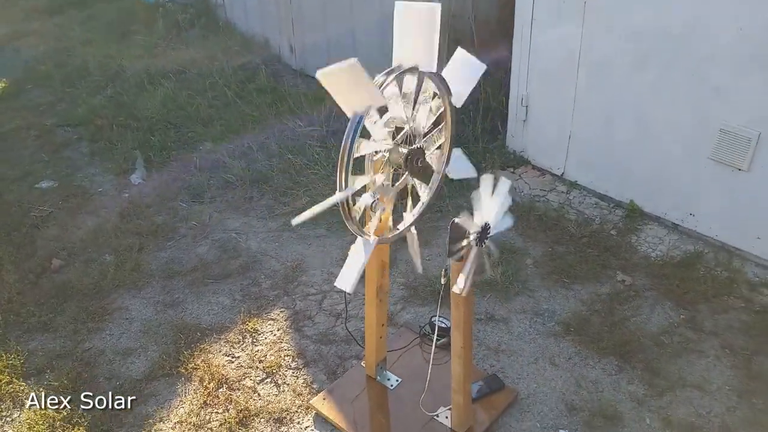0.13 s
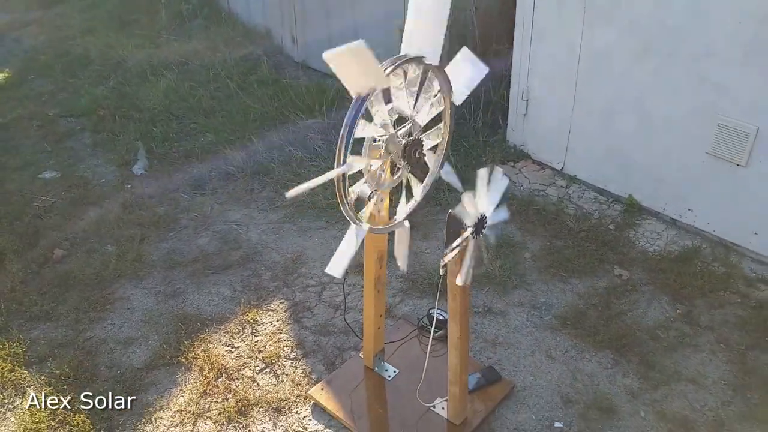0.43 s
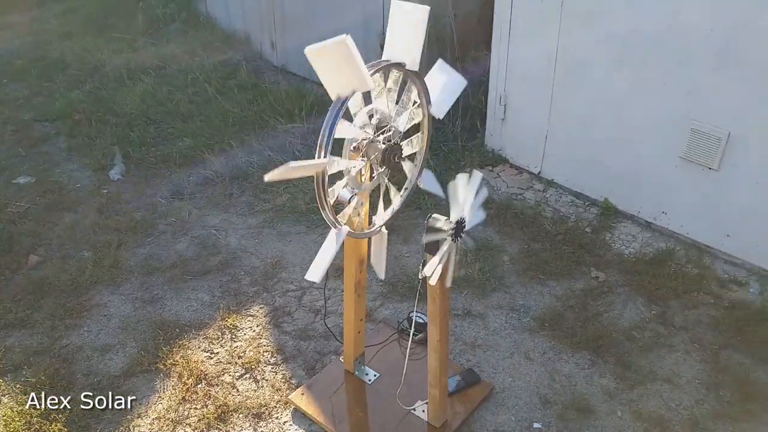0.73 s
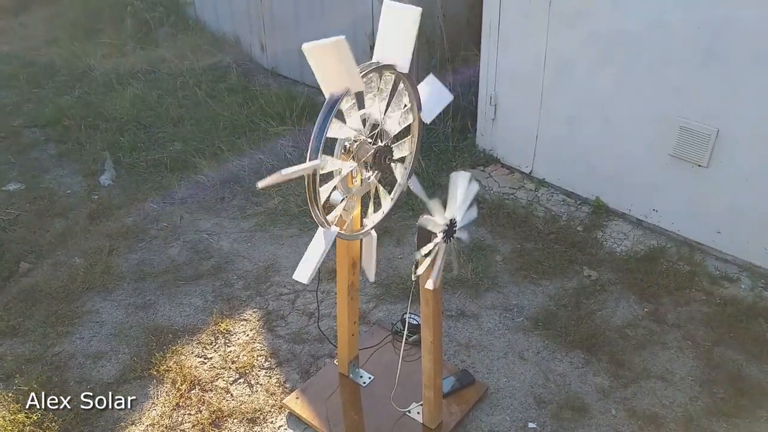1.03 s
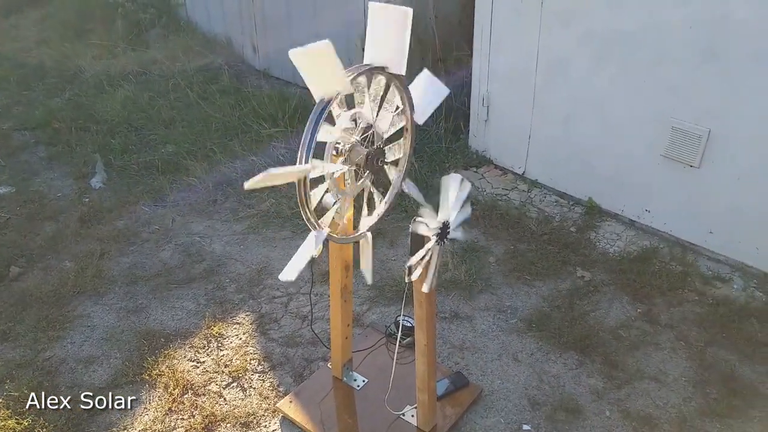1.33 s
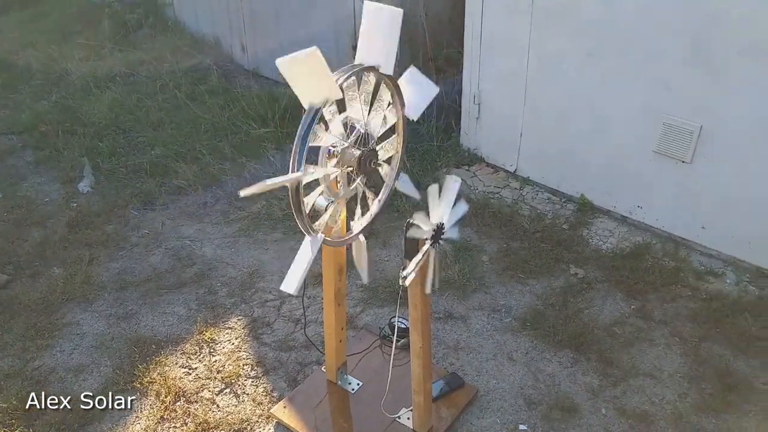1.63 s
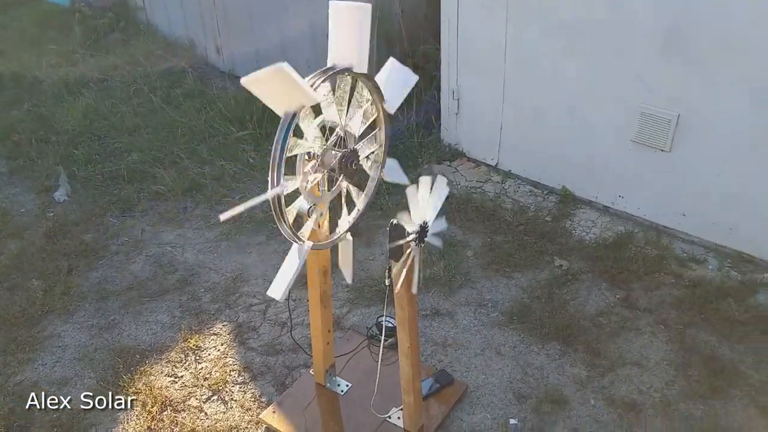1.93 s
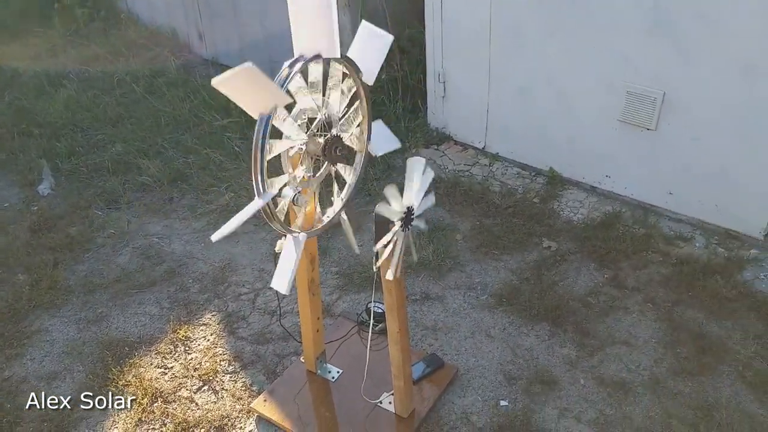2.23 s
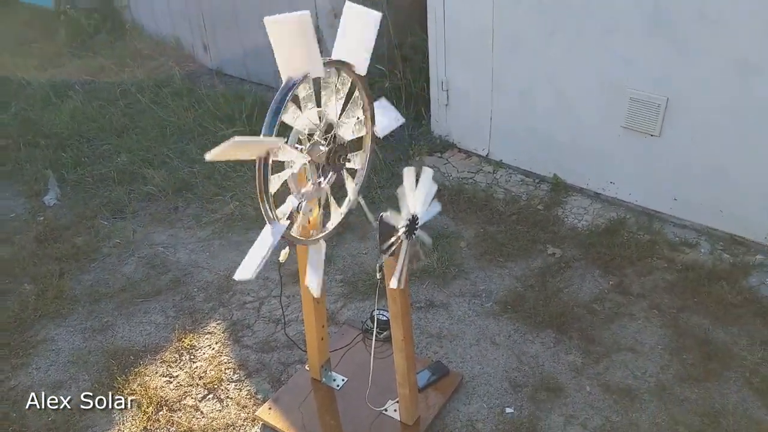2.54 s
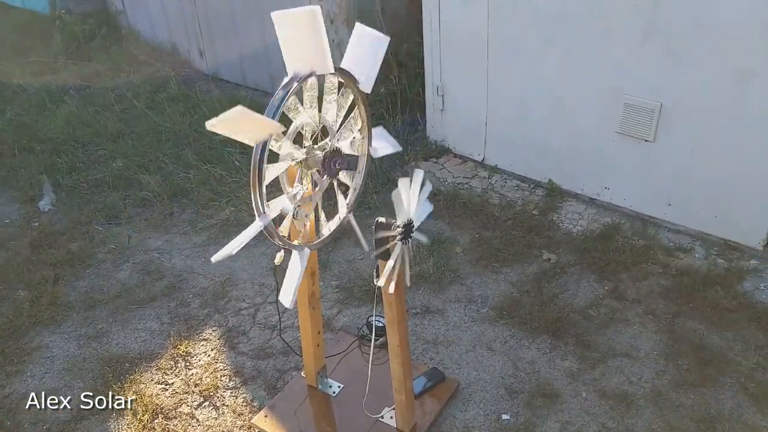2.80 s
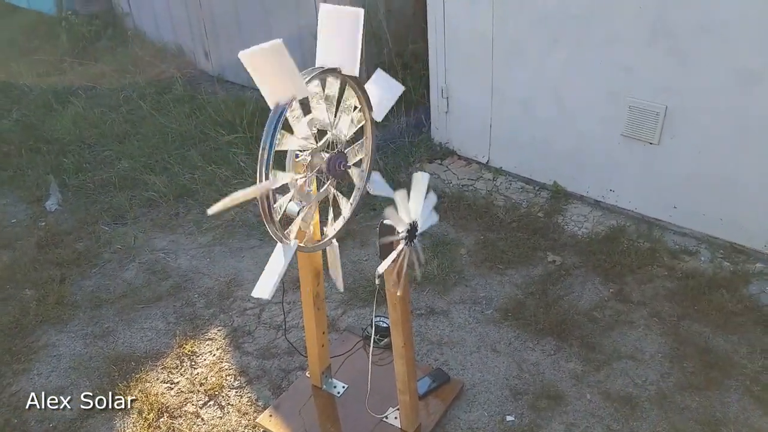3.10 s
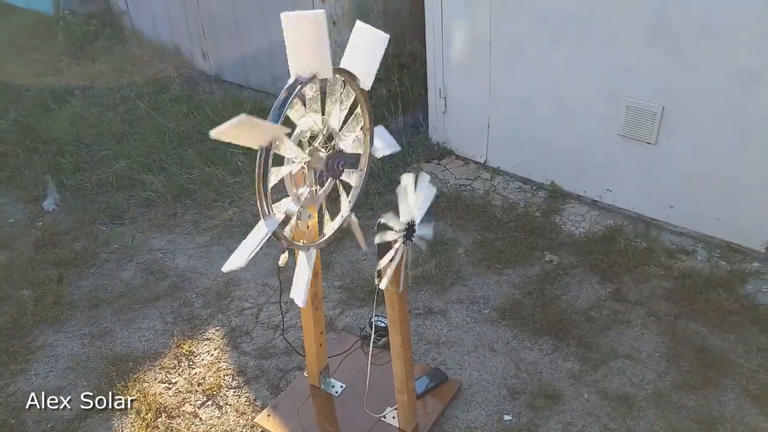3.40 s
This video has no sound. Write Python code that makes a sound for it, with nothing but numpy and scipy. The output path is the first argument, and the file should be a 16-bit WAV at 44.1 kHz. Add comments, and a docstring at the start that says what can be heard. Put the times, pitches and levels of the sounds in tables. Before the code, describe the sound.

Small wind turbine rotor whirs with rapid fluttering swishes while wind rumbles and buffets the microphone

```python
"""A small many-bladed wind rotor whirs in a yard, about fifteen turns a second: shaped noise for the steady
rush of blades, and a strong and a weak noise burst per turn for the swishes, with a narrow whistling hiss.
Wind rumbles throughout as slow-shaped noise; from early on, eddies buffet the microphone as short swings
and puffs. Midway its angle changes: the swishes darken and tighten into falling chops. After a lull the
buffets return at their hardest. The generator hums faintly on its post throughout, as narrow noise bands."""
import sys
import numpy as np
from scipy import signal
from scipy.fft import rfft, irfft
from scipy.io import wavfile
from scipy.ndimage import uniform_filter1d

SR = 44100
rng = np.random.default_rng(int(sys.argv[2]) if len(sys.argv) > 2 else 0)


def put_to_file(sound):
    """Save the sound as 16-bit audio at rate SR, in the file named by the first command-line argument."""
    columns = np.atleast_2d(sound).T  # one column per channel
    safe = np.clip(columns, -1, 1)
    whole_steps = np.round(safe * 32767)
    wavfile.write(sys.argv[1], SR, whole_steps.astype(np.int16))


N = 156996
FRAME = 256  # samples


def amp(db):
    """Decibels to gain."""
    return 10 ** (np.asarray(db) / 20)


def evened(x):
    """Scales to rms 1."""
    return x / np.sqrt(np.mean(x ** 2) + 1e-20)


def curve(table, t, axis=1):
    """One column of a table, joined by straight lines in time."""
    rows = np.array(table, float)
    return np.interp(t, rows[:, 0], rows[:, axis])


def colour(table, hz, axis=1):
    """One column of a table, joined by straight lines on log frequency."""
    rows = np.array(table, float)
    return np.interp(np.log(hz + 1), np.log(rows[:, 0]), rows[:, axis])


def wobble(rate_hz):
    """Smooth random signal of rms 1, rolled off above a rate."""
    hz = np.fft.rfftfreq(N, 1 / SR)
    slowed = rfft(rng.standard_normal(N)) / (1 + (hz / rate_hz) ** 4)
    return evened(irfft(slowed, N))


def grid(size):
    """Frame times in s (a column) and bin frequencies in Hz (a row)."""
    hop = size // 4
    frame_s = np.arange(N // hop + 3)[:, None] * hop / SR
    return frame_s, np.fft.rfftfreq(size, 1 / SR)


def air(field_db, patch_db):
    """Turbulence noise: follows a time-frequency field in dB per Hz, with random patches."""
    size = 2 * (field_db.shape[1] - 1)
    frames = dict(nperseg=size, noverlap=size - size // 4)
    white = rng.standard_normal(N + 2 * size)
    bins = signal.stft(white, **frames)[2].T[:len(field_db)]
    patches = uniform_filter1d(rng.standard_normal(bins.shape), size=8, axis=0)
    patches = evened(uniform_filter1d(patches, size=4, axis=1))
    shaped = bins * amp(field_db + patch_db * patches)
    return signal.istft(shaped.T, **frames)[1][:N] * np.sqrt(SR / 2)


def angled(table, hz, share):
    """Blends the spectra of the two microphone angles by power, in dB."""
    share = np.clip(share, 0, 1)
    first_power = amp(colour(table, hz)) ** 2
    second_power = amp(colour(table, hz, axis=2)) ** 2
    return 10 * np.log10((1 - share) * first_power + share * second_power)


# rotor speed: start_s, turns_per_s
TURN_RATE = [(0, 15.14), (.8, 15.14), (1.1, 15.2), (2, 15.17), (2.5, 15.2), (2.8, 15.29), (3.05, 15.17),
             (3.5, 15.08)]
# progress from first to second angle (0-1): start_s, rush_share, strong_share, weak_share
ANGLE = [(0, 0.1, 0.024, .02), (1.1, 0, .03, 0.054), (1.7, 0.6, 0.046, 0.079), (1.95, 0.58, 0.23, 0.56),
         (2.3, 0.62, 0.24, 0.75), (2.67, 0.46, 1, 0.84), (3.0, 0.95, 0.97, 0.94), (3.56, 0.76, 0.66, .97)]
# rotor loudness offsets: start_s, rush_db, swish_db
EFFORT = [(0, 0.16, 1.1), (1.15, -0.1, 0.6), (1.6, -1, 2), (2.0, -0.9, 0.5), (2.35, -1, 0),
          (2.65, 1.1, 1.3), (2.85, 0.5, 2), (2.935, 1, 3.5), (3.0, 0, 1.2), (3.15, -0.5, 1.6),
          (3.38, 0, -1.5), (3.56, -0.5, 1.5)]
# delay within a swish at the second angle, scaled by each swish's sweep: pitch_hz, delay_s
SWEEP = [(1600, 0.0055), (3000, .001), (5000, -.0025), (7200, -0.0039), (9500, 0.0011)]
START_TURN = -0.03  # turns
SWISH_SPREAD_OCT, SWISH_PATCH_DB = 0.034, 0.75
FLUTTER_DB, FLUTTER_HZ = 1.3, 650
TIGHTEN = 0.15  # share of width lost at the second angle


def swish(spectrum, axis, place_turn, rise_s, fade_s, level_db, sweep):
    """Once a turn hiss swells and fades; at the second angle it is shorter and its bands are staggered."""
    t, hz = grid(size=FRAME)
    now = np.arange(N) / SR
    rotor_turns = START_TURN + np.cumsum(curve(TURN_RATE, now)) / SR
    turns = np.interp(t, now, rotor_turns) - place_turn
    nearest = np.round(turns).astype(int)
    share = np.clip(curve(ANGLE, t, axis=axis), 0, 1)
    offset_s = (turns - nearest) / curve(TURN_RATE, t) - sweep * share * colour(SWEEP, hz)
    width_s = np.where(offset_s < 0, rise_s, fade_s) * (1 - TIGHTEN * share)
    swell_db = -10 * np.log10(np.e) * (offset_s / width_s) ** 2
    detune_oct = SWISH_SPREAD_OCT * rng.standard_normal(size=128)[nearest]
    detuned_hz = hz * 2 ** detune_oct
    low_cut_db = -10 * np.log10(1 + (1200 / (hz + 1)) ** 4)
    field_db = angled(spectrum, detuned_hz, share) + low_cut_db + swell_db + curve(EFFORT, t, axis=2)
    flutter_db = FLUTTER_DB * wobble(FLUTTER_HZ)
    return air(field_db, SWISH_PATCH_DB) * amp(level_db + flutter_db)


# strong swish spectrum: pitch_hz, first_angle_db_per_hz, second_angle_db_per_hz
STRONG = [(1360, -86.5, -75.5), (2220, -76.5, -70), (3460, -70, -64.5), (3900, -77, -66),
          (5160, -72.5, -67), (6100, -85, -69.5), (6740, -71.5, -69), (7300, -70.5, -75),
          (7850, -75.5, -80), (9220, -71.5, -81), (9920, -82, -81), (12000, -87.5, -84), (15000, -103, -91)]


def strong_swish():
    """The stronger hiss burst of each turn."""
    return swish(STRONG, axis=2, place_turn=0.516, rise_s=0.0073, fade_s=0.0061, level_db=1.07, sweep=0.94)


# weak swish spectrum: pitch_hz, first_angle_db_per_hz, second_angle_db_per_hz
WEAK = [(1500, -100, -97), (2670, -83.5, -79), (3400, -72, -68), (4120, -85, -70.5), (4320, -75.5, -65),
        (6000, -78.5, -72), (6800, -74, -73.5), (7400, -74, -77), (8900, -77, -92), (10400, -85.5, -85.5),
        (13500, -95, -85), (15500, -96, -97)]


def weak_swish():
    """The weaker hiss burst, about half a turn from the strong one."""
    return swish(WEAK, axis=3, place_turn=0.02, rise_s=0.0087, fade_s=0.005, level_db=1.0, sweep=0.7)


# whistle spectrum: pitch_hz, first_angle_db_per_hz, second_angle_db_per_hz
WHISTLE = [(5500, -105, -110), (6460, -76, -88), (7220, -70, -78), (7840, -61.5, -73), (7910, -69, -78),
           (8600, -85, -92), (10100, -110, -112)]


def whistle():
    """Narrow hiss near the strong swish, weaker at the second angle."""
    return swish(WHISTLE, axis=2, place_turn=0.455, rise_s=0.0077, fade_s=0.0045, level_db=-0.54, sweep=0.066)


# rush spectrum: pitch_hz, first_angle_db_per_hz, second_angle_db_per_hz
RUSH = [(30, -96, -84), (70.4, -96, -92), (128, -65, -68), (199, -64.5, -67), (336, -73.5, -80),
        (600, -76.5, -76.5), (785, -75.5, -71.5), (1190, -74.5, -77), (1570, -78, -77), (1990, -74, -70.5),
        (2650, -77, -75), (3520, -78.5, -72.5), (4960, -74, -72), (5490, -74, -73), (6500, -91, -78.5),
        (8400, -82.5, -86.5), (9360, -78.5, -83), (10400, -93, -88), (12400, -86.5, -87),
        (14200, -96, -86.5), (15500, -95, -94)]
# offset of the top treble: start_s, level_db
TREBLE = [(1.65, -1), (1.95, 2.5), (2.6, 0.5), (3.0, 0.5)]
TREBLE_HZ, RUSH_PATCH_DB = 10900, 1.89


def rush():
    """The steady rush of all the blades: patchy noise that follows angle and effort."""
    t, hz = grid(size=2 * FRAME)
    top_db = curve(TREBLE, t) * (hz > TREBLE_HZ)
    field_db = angled(RUSH, hz, curve(ANGLE, t)) + curve(EFFORT, t) + top_db
    return air(field_db, RUSH_PATCH_DB)


# single eddies, level before the swing and puff gains: start_s (centre), level_db, pitch_hz, half_length_s
BUFFETS = [(0.038, -36.5, 130.5, 0.011), (0.309, -31, 140, 0.0088), (0.339, -27.5, 190, 0.0064),
           (0.465, -28.5, 130, .004), (0.905, -24, 140, 0.0068), (0.989, -25, 132, 0.0048),
           (1.048, -23.5, 135, 0.0069), (1.157, -22.5, 210, .006), (1.223, -29, 229.4, .012),
           (1.261, -23, 175, 0.0023), (1.293, -22.5, 255, 0.0045), (1.31, -29, 245, 0.0035),
           (1.411, -25, 190, 0.0071), (1.438, -20.5, 115, 0.0092), (1.492, -25, 144, 0.006),
           (1.523, -24.5, 195, .003), (1.559, -26.5, 170, 0.0084), (1.689, -23, 170, 0.0045),
           (1.741, -28, 160, 0.011), (1.818, -32, 150, 0.0065), (1.865, -27.5, 131, 0.0054),
           (1.962, -28, 173, .005), (2.01, -26.5, 150, 0.011), (2.816, -23.5, 140, 0.015),
           (2.877, -23.5, 120, 0.0047), (2.944, -23, 230, 0.01), (2.977, -22, 240, 0.0063),
           (3.034, -15.5, 290, 0.0024), (3.06, -22.5, 165, 0.014), (3.09, -27, 290, 0.0056),
           (3.202, -25, 170, 0.011), (3.273, -13, 180, 0.0026), (3.299, -17.5, 160, 0.0086),
           (3.363, -19, 180, 0.0069), (3.382, -17.5, 230, 0.0025), (3.432, -20.5, 178, 0.007),
           (3.481, -20, 200, 0.0022), (3.494, -16, 135, 0.0073)]
# puff spectrum, relative: pitch_hz, level_db
PUFF = [(100, -8), (300, 2), (480, -6), (700, -19.5), (1400, -18.5), (3000, -58)]
# gains relative to each buffet's level
BUFFET_SWING_DB, BUFFET_OVERTONE_DB, PUFF_DB = -0.9, -13, -11
PITCH_WANDER, PITCH_WANDER_HZ = 0.1997, 114.4  # rms share of pitch, rate


def buffets():
    """Eddies strike the microphone: a brief, low, lopsided pressure swing tears off a puff of noise."""
    now, out = np.arange(N) / SR, np.zeros(N)
    wander_s = np.cumsum(PITCH_WANDER * wobble(PITCH_WANDER_HZ)) / SR
    puff_gain = amp(colour(PUFF, np.fft.rfftfreq(N, 1 / SR)))
    puff = amp(PUFF_DB) * evened(irfft(rfft(rng.standard_normal(N)) * puff_gain, N))
    phases_turn = rng.random(len(BUFFETS))
    for (centre_s, level_db, pitch_hz, half_length_s), phase_turn in zip(BUFFETS, phases_turn):
        swell = np.exp(-0.5 * ((now - centre_s) / half_length_s) ** 2)
        swing_rad = 2 * np.pi * (pitch_hz * (now + wander_s) + phase_turn)
        fundamental = amp(BUFFET_SWING_DB) * np.sin(swing_rad)
        overtone = amp(BUFFET_OVERTONE_DB) * swell * np.sin(2 * swing_rad)
        out += amp(level_db) * swell * (fundamental + overtone + puff)
    return out


# wind at the microphone, before WIND_DB: start_s, level_db
GUST = [(0, -47.5), (.3, -38), (.4, -47.5), (.5, -39), (.77, -51), (.9, -38), (1.1, -37), (1.25, -34),
        (1.38, -35.5), (1.53, -34), (1.61, -37.5), (1.72, -36.5), (2.0, -40), (2.07, -40), (2.28, -51),
        (2.4, -40.5), (2.5, -45), (2.72, -35), (2.85, -36.5), (3.0, -33), (3.15, -32.5), (3.4, -33.5),
        (3.56, -37)]
# rumble spectrum, relative, at a gust level of -30 dB: pitch_hz, level_db
RUMBLE = [(20, -25), (42, -32), (65, -55), (90, -13), (150, -5), (240, -1.5), (330, -6), (450, -9.5),
          (650, -23.5), (1200, -46), (3000, -64)]
WIND_DB, LUMPS_DB, LUMPS_HZ = 2, 1.94, 35
BRIGHTEN_OCT_PER_DB = 0.2044


def wind():
    """Lumpy rumble on the microphone; stronger gusts shift its spectrum up."""
    t, hz = grid(size=4 * FRAME)
    brighten_oct = BRIGHTEN_OCT_PER_DB * (curve(GUST, t) + 30)
    rumble = evened(air(colour(RUMBLE, hz / 2 ** brighten_oct), patch_db=-1.0))
    lumpy = evened(rumble * amp(LUMPS_DB * wobble(LUMPS_HZ)))
    return lumpy * amp(WIND_DB + curve(GUST, np.arange(N) / SR))


# generator resonances: pitch_hz, width_hz, level_db
HUM = [(277.5, 29.5, -50.5), (389.7, 3.4, -56)]


def hum():
    """Faint wavering resonances of the generator: narrow noise around each pitch."""
    now, out = np.arange(N) / SR, np.zeros(N)
    for pitch_hz, width_hz, level_db in HUM:
        waver = wobble(width_hz) + 1j * wobble(width_hz)
        tone = (waver * np.exp(2j * np.pi * pitch_hz * now)).real
        out += amp(level_db) * evened(tone)
    return out


# left minus right: pitch_hz, level_db
BALANCE = [(750, 0), (1000, 1.3), (1500, 1.7), (2100, .4), (2700, 0), (8000, 0), (8800, -1.5), (9800, -1),
           (10400, 0)]
# gain of a noise, shaped like the rush, that differs between the sides: pitch_hz, level_db
WIDTH = [(820, -79), (1000, -67), (2100, -8.5), (2500, -22.5), (5000, -73), (7500, -72), (8800, -30),
         (9600, -3), (10600, -50)]


def scene():
    """Rotor and wind, nearly mono; a little noise in two narrow bands differs between the sides."""
    hz = np.fft.rfftfreq(N, 1 / SR)
    swishes = strong_swish() + weak_swish() + whistle()
    mono = swishes + rush() + buffets() + wind() + hum()
    side = rfft(rush()) * amp(colour(WIDTH, hz))
    lean_db = colour(BALANCE, hz)
    balanced = rfft(mono) * amp(np.array([lean_db, -lean_db]) / 2)
    return irfft(balanced + np.array([side, -side]), N)


LOW_CUT_HZ, EDGE_HZ = 76, 15750


def record(dry):
    """The microphone's bass cut, then the band limit."""
    hz = np.fft.rfftfreq(N, 1 / SR)
    thinned = irfft(rfft(dry) / np.sqrt(1 + (LOW_CUT_HZ / (hz + 1)) ** 6), N)
    band_limit = signal.firwin(1023, EDGE_HZ, window=("kaiser", 9), fs=SR)
    return signal.oaconvolve(thinned, band_limit[None], "same")


dry = scene()
out = record(dry)
put_to_file(out)
```